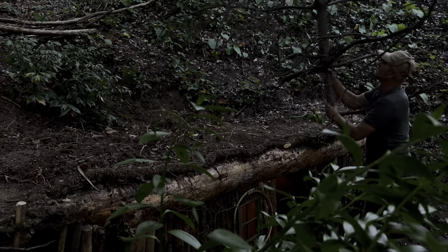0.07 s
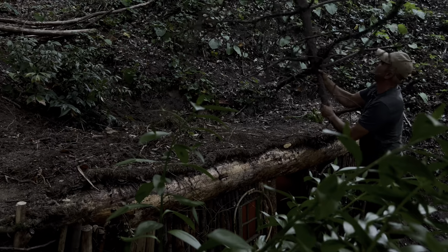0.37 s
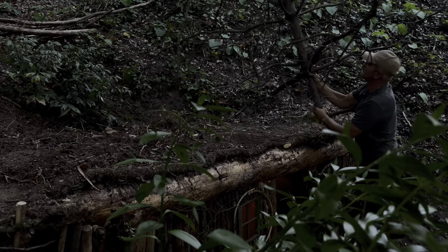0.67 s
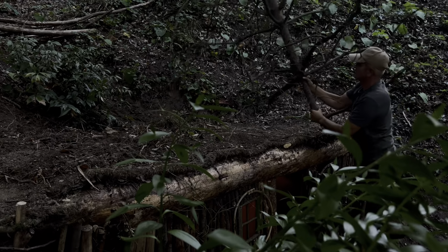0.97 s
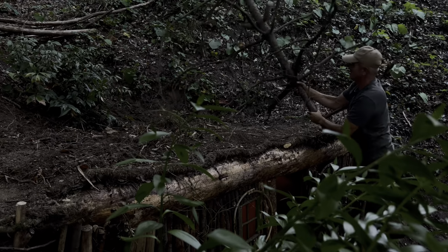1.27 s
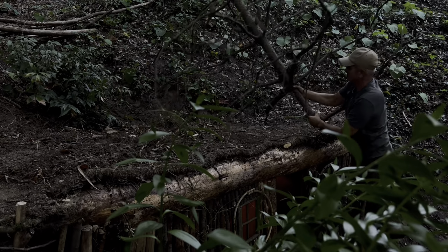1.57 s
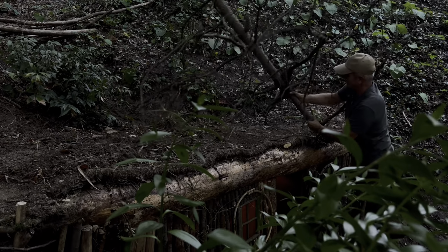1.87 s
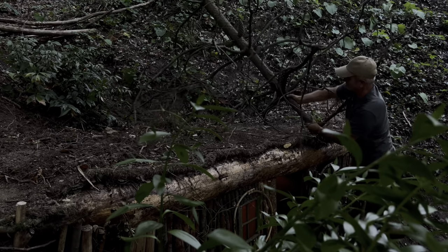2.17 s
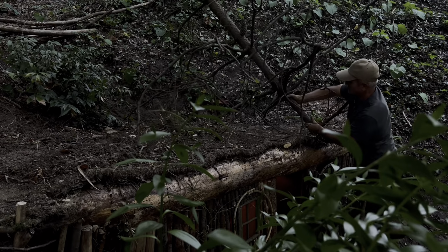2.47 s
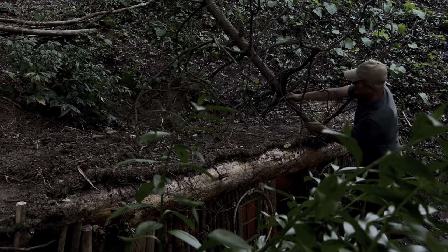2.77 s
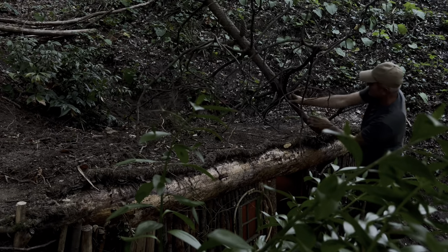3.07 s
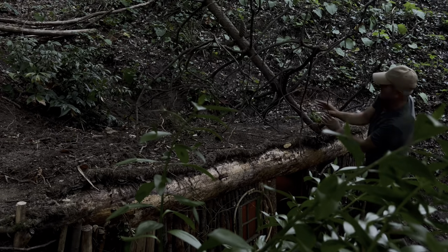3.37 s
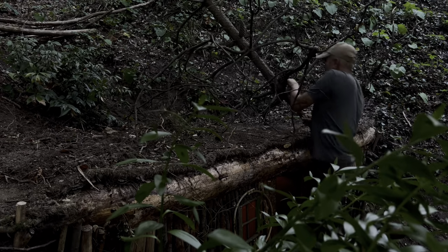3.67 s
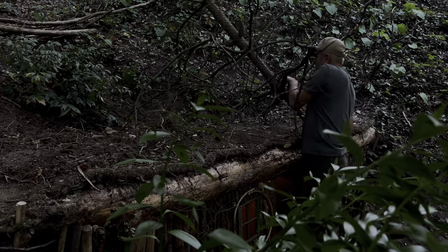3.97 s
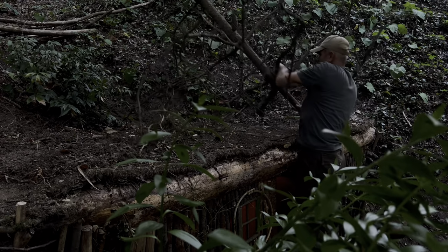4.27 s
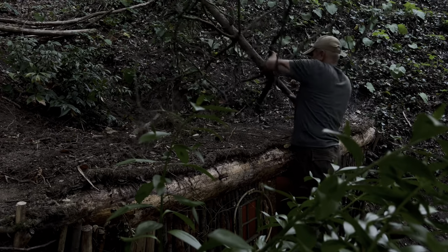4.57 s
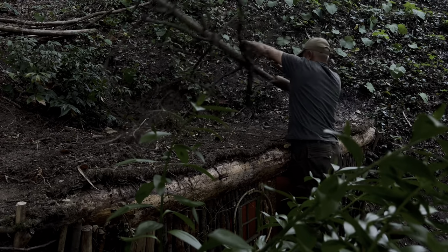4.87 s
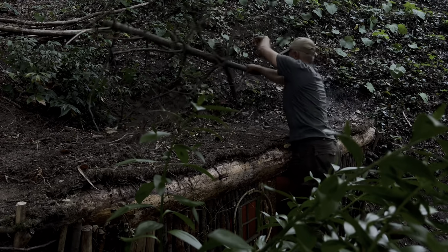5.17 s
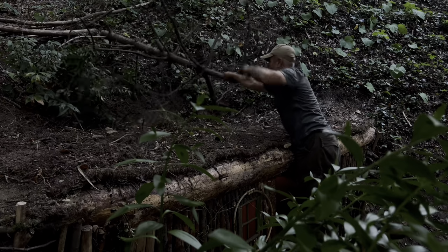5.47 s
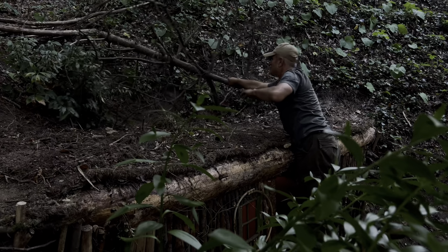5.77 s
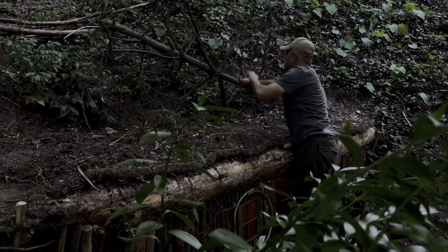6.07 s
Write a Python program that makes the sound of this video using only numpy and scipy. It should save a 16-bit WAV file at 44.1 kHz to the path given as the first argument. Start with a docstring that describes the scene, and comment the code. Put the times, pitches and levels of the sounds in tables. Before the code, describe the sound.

A steady low rumble and faint hiss lie under a forest scene heard from a few metres away. Boots thud on soil and crunch leaf litter at the start and around 0.6 seconds. From 1 second a leafy branch is pulled down: leaves rustle, the wood creaks faintly and small twigs crack, with a loud crack at 2 seconds. The rustle fades to a lull with a soft scuff near 2.8 seconds. At about 3.4 seconds a dry shoot snaps sharply, echoing briefly among the trees. Several dull footfalls and scuffs follow between 3.9 and 5.3 seconds. From 4 seconds a second pull builds, the branch scraping and brushing through bushes slightly to the left. It is loudest from 4.8 to 5.6 seconds, with clusters of bright cracks around 5 and 5.5 seconds. Lighter rustling and small cracks continue until the end, just after 6 seconds.

```python
"""A long leafy branch is levered down by hand on a forest slope, a few metres away.
Its crown drags through the foliage in countless tiny contacts. The bending wood creaks as its fibres
slip, twigs fracture and ring, one dry side shoot snaps sharply, and a man's boots thud on the soil.
The trees scatter every crack back; under it all lie a low rumble and a faint hiss."""
import sys
import numpy as np
from scipy import signal
from scipy.fft import rfft, irfft, next_fast_len
from scipy.io import wavfile
from scipy.ndimage import map_coordinates

SR = 44100
rng = np.random.default_rng(int(sys.argv[2]) if len(sys.argv) > 2 else 0)


def master_out(mix):
    """Clip the mix to full scale and print it as 16-bit PCM to the path in sys.argv[1]."""
    frames = np.transpose(np.atleast_2d(mix))
    ceiling = np.clip(frames, -1, 1)
    pcm = np.round(ceiling * 32767).astype(np.int16)
    wavfile.write(sys.argv[1], SR, pcm)


N = 278925

# loudness of the crown's scrape: level_db at a firm pull, growth_db_per_db of drag
SCRAPE_LAW = (-53, 0.75)


def amp(db):
    """Amplitude grows tenfold for every 20 dB."""
    return 10 ** (np.asarray(db) / 20)


def unit(x):
    """Normalisation to an rms of 1."""
    return x / np.sqrt(np.mean(x ** 2) + 1e-20)


def along(points, hz):
    """Interpolation of (frequency_hz, value) points on a logarithmic frequency axis."""
    knots_hz, values = np.transpose(points)
    return np.interp(np.log(hz + 1), np.log(knots_hz), values)


def wobble(rate_hz):
    """Slow random modulation: a spline through Gaussian knots."""
    knots = rng.standard_normal(int(N * rate_hz / SR) + 4)
    return map_coordinates(knots, [np.arange(N) * rate_hz / SR])


def filtered(x, response):
    """Zero-phase filtering: the spectrum is multiplied by a real response."""
    size = next_fast_len(N + SR // 2)
    return irfft(rfft(x, size) * response(np.fft.rfftfreq(size, 1 / SR)), size)[..., :N]


def coloured(x, gain_db):
    """Minimum-phase filtering by a dB curve: it is causal, so attacks stay sharp."""
    size = 2048
    cepstrum = irfft(np.log(amp(gain_db(np.fft.rfftfreq(size, 1 / SR)))))
    cepstrum[1:size // 2] *= 2
    cepstrum[size // 2 + 1:] = 0
    impulse_response = irfft(np.exp(rfft(cepstrum)))
    return signal.fftconvolve(x, impulse_response[None], axes=1)[:, :N]


def add(track, start_s, sound):
    """Superposition: a sound is summed into the track from start_s on."""
    part = track[..., max(round(start_s * SR), 0):][..., :sound.shape[-1]]
    part += sound[..., :part.shape[-1]]


def spread(pair, spectrum):
    """Coherence falls with frequency: two noises become coloured stereo, wide in the treble."""
    # likeness of left and right: frequency_hz, coherence
    coherence = [(60, 0.91), (150, 0.93), (700, 0.6), (1400, 0.72), (2600, 0.46), (5000, 0.38),
                 (15000, 0.17)]

    def response(hz):
        angle = np.arccos(np.clip(along(coherence, hz), -1, 1)) / 2
        return amp(along(spectrum, hz)) * np.array([np.cos(angle), np.sin(angle)])

    mid, side = filtered(pair, response)
    return unit(np.array([mid + side, mid - side]))


def right_first(x):
    """Delay: the sound reaches the left a quarter millisecond after the right."""
    return np.array([np.pad(x, (11, 0))[:len(x)], x])


def grains(rate_hz, scatter_db, t60_s, blur):
    """Shot noise: tiny contacts of random size add in power, over a blur of farther ones."""
    sizes = amp(scatter_db * np.minimum(rng.exponential(size=N), 4))
    contacts = sizes * (rng.random(N) < rate_hz / SR)
    t = np.arange(SR // 20) / SR
    power = np.abs(signal.fftconvolve(contacts ** 2, amp(-60 * t / t60_s) ** 2)[:N])
    return rng.standard_normal((2, N)) * np.sqrt(power / power.mean() + blur ** 2)


def air():
    """Ambient noise: a far low rumble that wavers slightly, and a faint even hiss."""
    # spectra of the two noises: frequency_hz, gain_db
    rumble_spectrum = [(20, -16.5), (30, -32), (40, -15), (52, -3), (66, 4), (82, -4.5), (120, -8),
                       (165, -15), (240, -24.5), (330, -29.5), (600, -34), (1200, -60)]
    hiss_spectrum = [(300, 5), (1000, -1), (2200, 3.5), (4700, -2.5), (8000, 7.5), (9200, 0), (12000, -17),
                     (15500, -7.5)]
    rumble = spread(rng.standard_normal((2, N)), rumble_spectrum) * amp(-48.0 + 0.47 * wobble(3.65))
    hiss = spread(rng.standard_normal((2, N)), hiss_spectrum) * amp(-63.5)
    return rumble + hiss


def thuds():
    """Damped impact: leaf litter crunches under the weight, then the soil thuds, sinking in pitch."""
    # boots and the butt of the branch on soil: start_s, thud_db, nominal_pitch_hz, crunch_db
    impacts = [(0.1, -29, 115, -47), (0.622, -38, 407, -44.5), (0.636, -28.5, 321, -42.5),
               (0.646, -34, 258, -41.5), (0.843, -52, 427, -57), (3.33, -41, 130, -66),
               (3.896, -31.5, 187, -45.5), (4.444, -38.5, 236, -47.5), (4.620, -40.5, 172, -48.5),
               (5.273, -33.5, 201, -42.5)]
    # boots and hands sliding: centre_s, half_length_s, level_db
    scuffs = [(0.094, 0.014, -46), (0.63, 0.011, -43), (0.685, 0.016, -50.5), (2.803, 0.058, -52.5),
              (3.346, 0.027, -63.5), (3.958, 0.054, -49), (4.561, 0.023, -39.5), (5.29, 0.023, -45.5)]
    # spectrum of crushed leaf litter: frequency_hz, gain_db
    litter_spectrum = [(100, 11), (380, 2), (700, -4.5), (1600, -4), (3000, -12), (4800, -23.5),
                       (14000, -31)]
    t = np.arange(SR // 8) / SR
    glide = 0.64 + 0.98 * np.exp(-t / 0.0058)
    push = (t / 0.0035) * np.exp(1 - t / 0.0038)
    crush = (t / 0.0035) * np.exp(1 - t / 0.005)
    soil, pressure = np.zeros((2, N))
    for start_s, thud_db, nominal_pitch_hz, crunch_db in impacts:
        turns = nominal_pitch_hz * np.cumsum(glide) / SR
        add(soil, start_s, amp(thud_db) * push * np.sin(2 * np.pi * turns))
        add(pressure, start_s - .005, amp(crunch_db) * crush)
    for centre_s, half_length_s, level_db in scuffs:
        pressure += amp(level_db) * np.exp(-((np.arange(N) / SR - centre_s) / half_length_s) ** 2)
    litter = spread(grains(rate_hz=870, scatter_db=6.0, t60_s=0.022, blur=1.0), litter_spectrum)
    return soil + pressure * litter


def forest(x):
    """Multiple scattering: trunks and foliage return a soft tail, different every quarter second."""
    # reverberation time among the trees: frequency_hz, t60_s
    decay_times = [(150, 0.47), (700, 0.39), (2000, 0.78), (6000, 0.57), (12000, 0.46), (16000, 0.53)]
    colour = [(200, -2), (850, -2), (1800, -8), (6000, 1), (9000, -1.5), (12000, -1)]
    echo = np.zeros((2, N))
    step = SR // 4
    for start in range(0, N, step):
        hz, t, noise = signal.stft(rng.standard_normal((2, SR * 3 // 4)), SR, nperseg=256)
        envelope = amp(-60 * t / along(decay_times, hz)[:, None]) * (1 - np.exp(-t / 0.00298))
        tail = signal.istft(noise * envelope, SR, nperseg=256)[1]
        tail /= np.linalg.norm(tail[0])
        add(echo, start / SR, signal.fftconvolve(x[:, start:start + step], tail, axes=1))
    return coloured(echo, lambda hz: along(colour, hz))


def dragged(t, level_db, growth):
    """Friction noise follows a power law: level_db at a firm pull, plus growth dB per dB of drag."""
    # the crown's drag, two pulls with a change of grip between them: time_s, drag_db
    drag = [(0.95, -76), (1.14, -52.5), (1.42, -62.9), (1.6, -52.5), (1.72, -56.5), (1.96, -46.5),
            (2.2, -53.5), (2.62, -66.5), (3.05, -67), (3.38, -76.5), (3.82, -71.5), (4.04, -54.5),
            (4.28, -50), (4.4, -50.5), (4.7, -45), (4.88, -35.5), (5.12, -39), (5.44, -37.5), (5.76, -47.5),
            (5.94, -46), (6.06, -48.5), (6.25, -47.5)]
    firm_pull_db = -50
    return level_db + growth * (np.interp(t, *np.transpose(drag)) - firm_pull_db)


def thin_twigs(count):
    """Random fracture: small breaks at chance moments, scaled to the crown's scrape just then."""
    start_s = (np.arange(count) + rng.random(count)) / count * N / SR
    tear, ring, octave = rng.standard_normal((count, 3)).T
    scrape_db = dragged(start_s, *SCRAPE_LAW)
    fracture_db = scrape_db + 13.5 + 2.5 * tear
    wood_db = scrape_db - 3 + 2.5 * ring
    pitch_hz = 1745 * 2 ** (0.351 * octave)
    return list(zip(start_s, fracture_db, wood_db, pitch_hz))


def fracture(t, tear_s, splinter_db, splinter_t60_s):
    """Brittle fracture: fibres part in one brief burst, then splinters follow."""
    tear = rng.standard_normal(len(t)) * (t / tear_s) * np.exp(-t / tear_s)
    envelope = amp(-60 * t / splinter_t60_s) * (1 - np.exp(-t / tear_s))
    splinters = rng.standard_normal((2, len(t))) * envelope
    return right_first(unit(tear)) + amp(splinter_db) * unit(splinters)


def wood(t, pitch_hz, octaves=0.65, t60_cycles=75, rise_cycles=0.7, width=0.11, limb_db=-13.5, count=64):
    """Bending modes of a twig: the low ones, fed by the limb, build up later and ring longer."""
    octave = np.linspace(-2.8, 1.5, count)[:, None] + .04 * rng.standard_normal((count, 1))
    strength = (np.exp(-(octave / octaves) ** 2 / 2) + amp(limb_db) * (octave < 0)) * 2 ** (octave / 2)
    turns = pitch_hz * 2 ** octave * t
    envelope = amp(-60 * turns / t60_cycles) * (1 - np.exp(-turns / rise_cycles))
    modes = strength * envelope * np.sin(2 * np.pi * (turns + rng.random((count, 1))))
    mid, side = modes.sum(0), rng.standard_normal(count) @ modes
    return unit(unit(mid) + width * unit(side) * np.array([[1], [-1]]))


def cracks():
    """Impulse excitation: a bright fracture and a crunch of tearing fibres set each twig ringing."""
    # main twigs that break, and the low knocks of the limb shaken by big cracks (1.984, 5.046, 5.575 s), with
    # relative levels: start_s, fracture_db, wood_db, pitch_hz
    breaks = [(0.8423, -38, -56, 1580), (1.044, -34, -52.5, 2300), (1.1122, -33, -45.5, 1660),
              (1.1715, -39, -43.5, 1286), (1.2226, -27, -39, 1400), (1.4878, -33, -56, 1880),
              (1.7546, -27, -62, 2300), (1.8437, -23.5, -63, 2170), (1.919, -22.5, -41.5, 2090),
              (1.972, -8, -29.5, 2195), (1.9761, -28, -30.5, 1450), (1.984, -40, -36.5, 700),
              (2.1422, -30, -47.5, 1970), (2.325, -31, -45, 2190), (2.4543, -42, -52, 1114),
              (2.8542, -48, -67, 1620), (3.4639, -18, -40, 1330), (3.797, -41.5, -75, 1900),
              (4.0265, -32.5, -54.5, 1404), (4.0904, -46, -45, 1637), (4.2309, -31, -45, 1450),
              (4.4444, -28, -45, 2220), (4.5637, -44, -40, 1856), (4.6524, -20, -42, 2300),
              (4.7869, -17.5, -37, 1650), (4.9005, -13, -29.5, 1805), (4.9321, -10, -20.5, 2287),
              (4.944, -8, -24, 1596), (5.039, -10, -25.5, 1800), (5.046, -40, -31.5, 850),
              (5.4322, -25, -38, 2134), (5.5383, -10, -34.5, 1763), (5.5684, -15.5, -30.5, 1643),
              (5.575, -40, -37.5, 798), (5.688, -22, -38, 1400), (5.7287, -25.5, -51, 1400),
              (6.1059, -28, -51, 1680)]
    # spectra of the fracture and the tearing fibres: frequency_hz, gain_db
    fracture_spectrum = [(600, -35), (2500, -11.5), (6500, -9), (8500, -4), (12000, -2.5), (15500, -8)]
    fibre_spectrum = [(900, -26), (1900, -2.5), (2900, -0.5), (3900, -4.5), (5200, -4), (8000, -22),
                      (14000, -34)]
    t = np.arange(SR // 10) / SR
    tears, fibres, rings = np.zeros((3, 2, N))
    for start_s, fracture_db, wood_db, pitch_hz in list(breaks) + thin_twigs(count=36):
        tear = fracture(t, tear_s=0.00038, splinter_db=2.5, splinter_t60_s=0.042)
        crunch = fracture(t, tear_s=0.0009, splinter_db=-0.5, splinter_t60_s=0.022)
        add(tears, start_s + 0.0007, amp(fracture_db - 20) * tear)
        add(fibres, start_s + 0.00097, amp(wood_db - 9.5) * crunch)
        add(rings, start_s + 0.000984, amp(wood_db - 13) * wood(t, pitch_hz))
    tears = coloured(tears, lambda hz: along(fracture_spectrum, hz))
    fibres = coloured(fibres, lambda hz: along(fibre_spectrum, hz))
    return tears + fibres + rings


def in_bushes(t, deepest_s=5.63, sink_s=0.24, release_s=0.58):
    """The crown's depth in the bushes, 0 to 1, follows an asymmetric Gaussian envelope."""
    return np.exp(-((t - deepest_s) / np.where(t < deepest_s, sink_s, release_s)) ** 2)


def crown():
    """Sliding friction: twigs scrape, sprays brush the bushes on the left and single leaves fizz."""
    # spectra of twigs, sprays and leaves: frequency_hz, gain_db
    scrape_spectrum = [(120, 11), (300, -3.5), (700, 3.5), (1100, -1.5), (1600, 1), (2600, 0.5), (4000, -5),
                       (8000, -42)]
    brush_spectrum = [(1200, -17.5), (2600, -9.5), (4200, -2.5), (5700, -0.5), (7200, -3), (9500, -3),
                      (15000, -39)]
    fizz_spectrum = [(3000, -29), (6500, -17), (8400, 5.5), (12000, 9), (15500, 3.5)]
    t = np.arange(N) / SR
    surge_db = 1.3 * wobble(30)  # the crown catches and slips free
    depth = in_bushes(t)  # the bushes brush louder and muffle the crown's own twigs and leaves
    scrape_db = dragged(t, *SCRAPE_LAW) + surge_db - 4 * depth
    brush_db = dragged(t, level_db=-53, growth=1.03) + surge_db + 3.5 * depth
    fizz_db = dragged(t, level_db=-47.5, growth=1.0) + surge_db - 4 * depth
    leftward_db = 1.84 * np.array([[1], [-1]])
    scrape = spread(grains(rate_hz=150, scatter_db=4.0, t60_s=0.043, blur=1.0), scrape_spectrum)
    brush = spread(grains(rate_hz=240, scatter_db=4.0, t60_s=0.034, blur=1.22), brush_spectrum)
    fizz = spread(grains(rate_hz=340, scatter_db=3.0, t60_s=0.015, blur=1.27), fizz_spectrum)
    return scrape * amp(scrape_db) + brush * amp(brush_db + leftward_db) + fizz * amp(fizz_db)


def creaks():
    """Stick-slip: strained fibres crackle densely, coloured by the resonance of the bending part."""
    # creaks of the bending wood: centre_s, half_length_s, level_db, pitch_hz
    bends = [(1.069, 0.04, -54, 3360), (1.18, 0.095, -55, 1890), (1.512, 0.018, -61.5, 536),
             (2.03, 0.054, -50.5, 720), (2.34, 0.16, -60, 750), (4.286, 0.034, -54.5, 2200),
             (4.488, 0.022, -48.5, 2800), (4.565, 0.027, -47, 1600), (4.81, 0.038, -42, 2800),
             (4.934, 0.0075, -27, 3600), (5.28, 0.014, -43, 650)]
    skirt_db_per_octave = -12.5
    t = np.arange(N) / SR
    slips = grains(rate_hz=400, scatter_db=3.6, t60_s=0.014, blur=0.65)
    out = np.zeros((2, N))
    for centre_s, half_length_s, level_db, pitch_hz in bends:
        resonance = [(pitch_hz * 2 ** k, skirt_db_per_octave * abs(k)) for k in range(-4, 5)]
        swell = amp(level_db) * np.exp(-((t - centre_s) / half_length_s) ** 2)
        out += spread(slips, resonance) * swell
    return out


def snap(start_s):
    """Sudden stress release in a dry shoot: a piercing tick, splinters and the pock of its stub."""
    # modes, the hollow stub first and the bright break last: pitch_hz, level_db, t60_s
    modes = [(690, -40, 0.067), (826, -21, 0.05), (1370, -31, 0.043), (1586, -28.5, 0.033),
             (2540, -21.5, 0.037), (3210, -8.5, 0.0041), (4800, -15, 0.0035), (9040, 2, 0.0027),
             (11660, 9, 0.0024), (12500, -19, .007)]
    colour = [(350, -23.5), (800, -11.0), (3000, -12.5), (8500, -12), (15000, -9)]
    t = np.arange(SR // 6) / SR
    ring, spray = np.zeros((2, 2, N))
    for pitch_hz, level_db, t60_s in modes:
        envelope = amp(level_db - 60 * t / t60_s) * (1 - np.exp(-pitch_hz * t / 2.9))
        mode = envelope * np.sin(2 * np.pi * (pitch_hz * t + rng.random()))
        # long waves reach both sides alike
        add(ring, start_s, right_first(mode) if pitch_hz > 2000 else mode)
    splinters = rng.standard_normal((2, len(t))) * (1 - np.exp(-t / .0004)) * amp(-60 * t / .026)
    add(spray, start_s, splinters)
    return ring + coloured(spray, lambda hz: along(colour, hz))


def bang(start_s):
    """An impulse is broadband: the snap spreads among the trees as one bang."""
    colour = [(350, -19), (800, 1.5), (2500, -2.5), (5500, 1.5), (8500, -11), (11800, 3), (15500, -11)]
    impulse = np.zeros((2, N))
    impulse[:, round(start_s * SR)] = 1
    return coloured(impulse, lambda hz: along(colour, hz))


def scene():
    """The direct sound of branch and boots adds to the forest's reverberation and ambient noise."""
    snap_s = 3.4484
    twigs, steps = cracks(), thuds()
    echo = forest(amp(-4.5) * (twigs + bang(snap_s)) + amp(-14.5) * steps)
    return twigs + snap(snap_s) + steps + echo + crown() + creaks() + air()


def record(dry):
    """Band limiting: the lowest bass and highest treble are cut, and the treble has two narrow dips."""
    # dips in the treble: centre_hz, half_width_hz, depth_db
    notches = [(10237, 540, 31), (13600, 610, 13)]
    low_hz, top_hz = 36, 16100

    def dips_db(hz):
        return -sum(depth_db * np.exp(-((hz - centre_hz) / half_width_hz) ** 2)
                    for centre_hz, half_width_hz, depth_db in notches)

    bass_cut = signal.sosfilt(signal.butter(4, low_hz, "high", fs=SR, output="sos"), dry)
    notched = coloured(bass_cut, dips_db)
    return filtered(notched, lambda hz: np.clip((top_hz - hz) / 300 + .5, 0, 1))


dry = scene()
out = record(dry)
master_out(out)
```